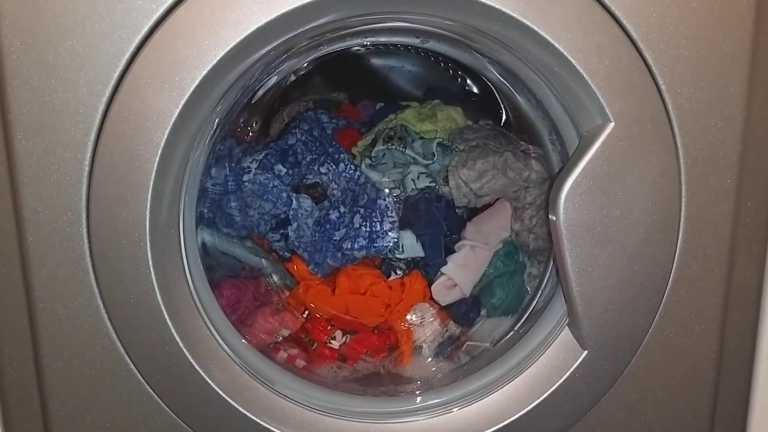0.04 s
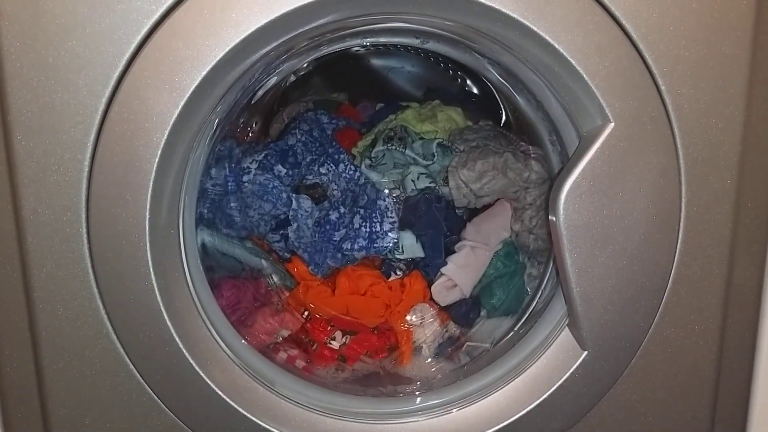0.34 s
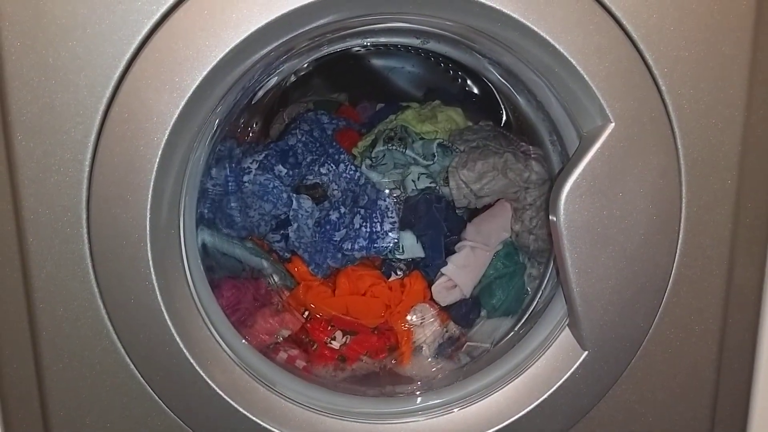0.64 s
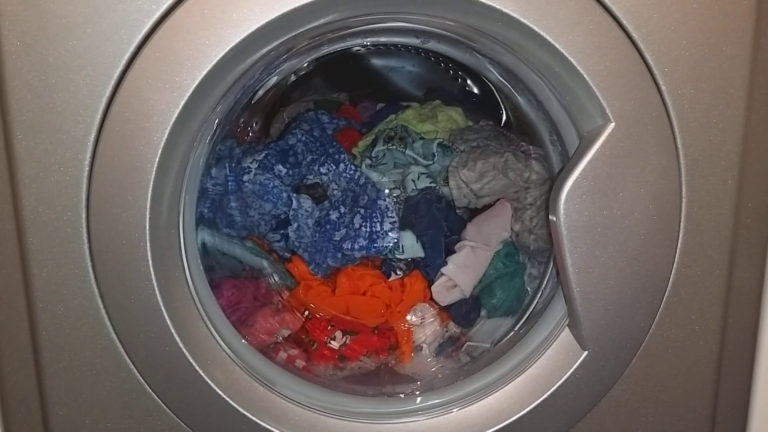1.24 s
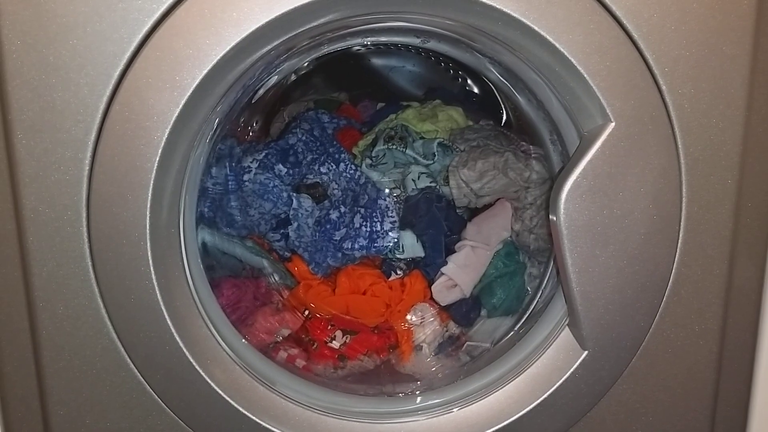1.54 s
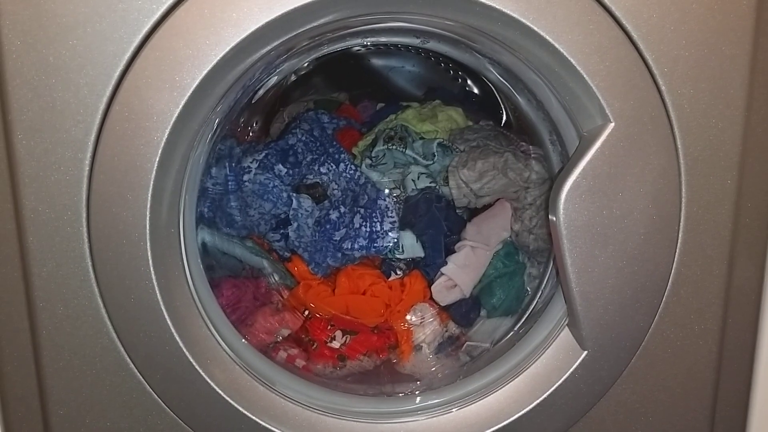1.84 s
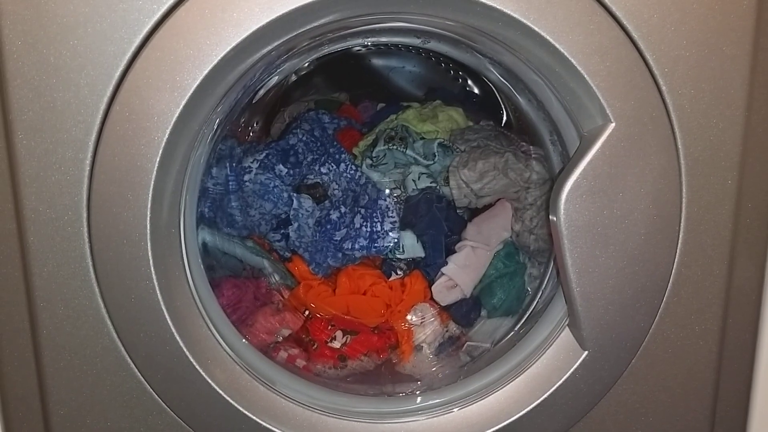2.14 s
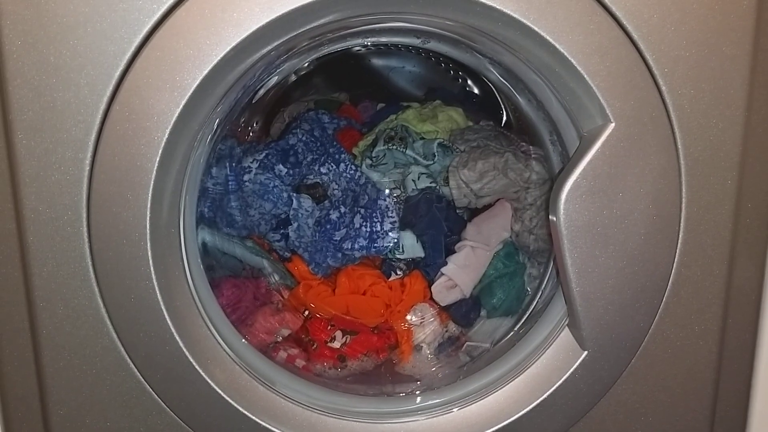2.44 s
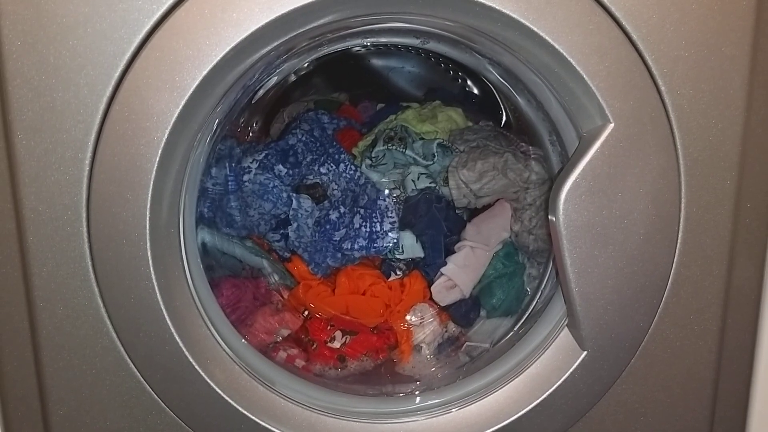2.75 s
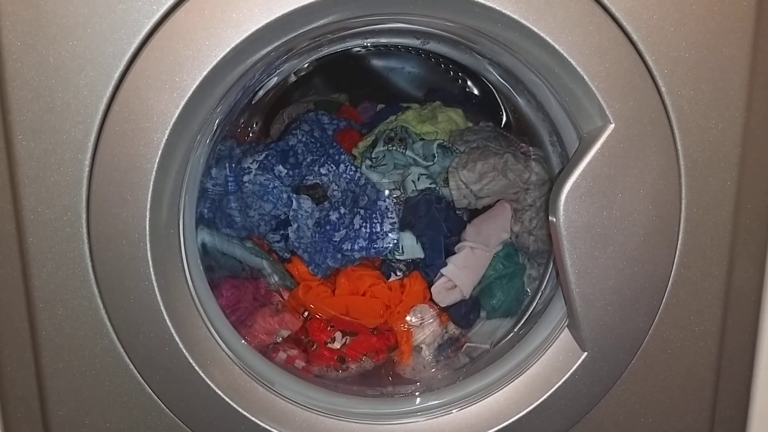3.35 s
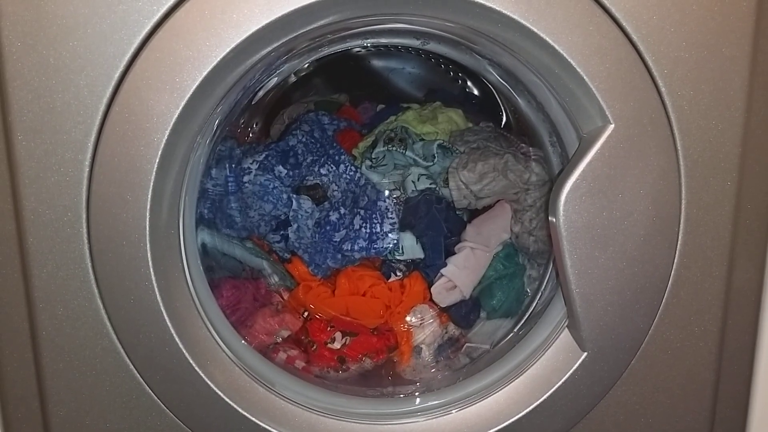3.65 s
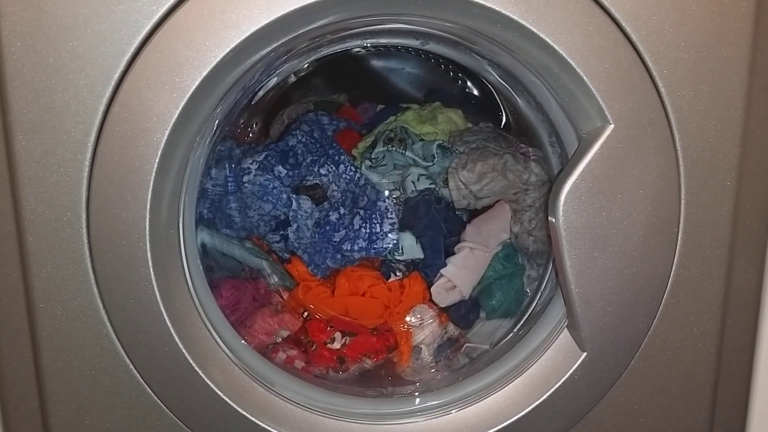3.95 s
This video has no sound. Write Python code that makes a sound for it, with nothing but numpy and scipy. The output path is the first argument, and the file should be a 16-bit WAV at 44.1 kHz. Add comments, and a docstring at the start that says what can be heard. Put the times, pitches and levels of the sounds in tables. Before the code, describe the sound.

A washing machine buzzes faintly over room noise, with soft trickles, a swish of wet cloth near 0.8 seconds and a drip at 1.4. At 1.7 seconds its drain pump starts with a few loud slugs of water, then churns air and water over a low, booming hum until the end at 4 seconds. Spray spits briefly, and the hose gurgles near 2.4, 3.6 and 3.9 seconds.

```python
"""A front-loading washing machine stands with a faint electric buzz over room noise.
Water trickles in the drum, wet cloth swishes, a drip falls. At 1.7 s the drain pump starts,
swallows a few slugs of water, then churns air and water over a mains hum while the sump booms.
Spray spits and the hose gurgles now and then; the splashes ring briefly in the steel cabinet."""
import sys
import numpy as np
from scipy import signal
from scipy.fft import rfft, irfft, next_fast_len
from scipy.io import wavfile
from scipy.ndimage import map_coordinates

SR = 44100
rng = np.random.default_rng(int(sys.argv[2]) if len(sys.argv) > 2 else 0)


def inscribe(sig):
    """Save sig as 16-bit PCM at rate SR to the path in sys.argv[1].

    A 1-D sig is mono; a 2-D sig holds one channel per row.
    Samples are clipped to [-1, 1] before scaling.
    """
    pcm = np.round(np.clip(np.atleast_2d(sig).T, -1, 1) * 32767)
    wavfile.write(sys.argv[1], SR, pcm.astype(np.int16))


N = 176400
TIME_S = np.arange(N) / SR


def amp(db):
    """Decibels to gain."""
    return 10 ** (np.asarray(db) / 20)


def along(points, hz):
    """Interpolate (hz, value) points on a log frequency axis."""
    knots_hz, values = np.transpose(points)
    return np.interp(np.log(hz + 1), np.log(knots_hz + 1), values)


def curves(rows):
    """One value per sample for each column after the time."""
    times_s, *columns = np.transpose(rows)
    return [np.interp(TIME_S, times_s, column) for column in columns]


def wobble(knots_per_s):
    """Smooth random curve."""
    return map_coordinates(rng.standard_normal(2048), [TIME_S * knots_per_s], mode="wrap")


def noise():
    """Two streams of white noise."""
    return rng.standard_normal((2, N))


def impacts(per_s, spread_db):
    """Two streams of tiny water impacts of random size."""
    hit = rng.random((2, N)) < per_s / SR
    return hit * np.sign(noise()) * amp(spread_db * np.clip(noise(), -2, 2))


def bursts(rows, attack_s, t60_s):
    """Envelope of events that rise, hold and die away."""
    power = 0
    for start_s, length_s, level_db in rows:
        rise = np.clip((TIME_S - start_s) / attack_s, 0, 1)
        decay_db = 60 * np.maximum(TIME_S - start_s - length_s, 0) / t60_s
        power += (rise * amp(level_db - decay_db)) ** 2
    return np.sqrt(power)


def filtered(x, response):
    """Apply a complex frequency response."""
    size = 2 * next_fast_len(N * 5 // 8)
    return irfft(rfft(x, size) * response(np.fft.rfftfreq(size, 1 / SR)), size)[..., :N]


def lowpass(hz, edge_hz):
    """Gain falling 24 dB per octave above the edge."""
    return 1 / (1 + (hz / edge_hz) ** 4)


def colour(points):
    """Minimum-phase response through (hz, db) points."""
    def response(hz):
        cepstrum = irfft(np.log(amp(along(points, hz))))
        causal = np.r_[cepstrum[0], 2 * cepstrum[1:len(cepstrum) // 2]]
        return np.exp(rfft(causal, len(cepstrum)))
    return response


def resonances(modes, hz):
    """Response of band-pass modes summed with alternating sign."""
    return sum((-1) ** k * amp(db) * 1j * hz * width / (centre ** 2 - hz ** 2 + 1j * hz * width)
               for k, (centre, width, db) in enumerate(modes))


# Left-right likeness: freq_hz, correlation
LIKENESS = [(60, 0.55), (170, 0.77), (350, 0.96), (700, 0.58), (1300, 0.26), (2300, 0.29), (4000, 0.075),
            (12000, 0)]
def stereo_angle(hz):
    """Angle between the channels in radians; 0 is identical."""
    return np.arccos(np.clip(along(LIKENESS, hz), -1, 1))


def pan_gains(pan, hz):
    """Left and right gains from a level difference."""
    return amp(np.outer([.5, -.5], along(pan, hz)))


def placed(pair, response, pan):
    """Two unrelated signals become a coloured stereo sound whose middle has rms 1."""
    def mid_side(hz):
        angle = stereo_angle(hz) / 2
        return response(hz) * np.array([np.cos(angle), np.sin(angle)])
    mid, side = filtered(pair, mid_side)
    out = filtered(np.array([mid + side, mid - side]), lambda hz: pan_gains(pan, hz))
    return out / out.mean(axis=0).std()


# Cabinet decay: freq_hz, t60_s
CABINET_DECAY = [(150, 0.1), (1000, 0.11), (4000, 0.3), (12000, 0.053)]
def cabinet(x, ring_db=-4.5):
    """Add the short ring of the steel cabinet."""
    hz, t, spectrum = signal.stft(rng.standard_normal((2, SR // 4)), SR, nperseg=256)
    decay = amp(-60 * t / along(CABINET_DECAY, hz)[:, None])
    tail = signal.istft(spectrum * decay, SR, nperseg=256)[1]
    tail /= np.linalg.norm(tail[0])
    return x + amp(ring_db) * signal.fftconvolve(x, tail, axes=1)[:, :N]


# Buzz spectrum: freq_hz, gain_db
BUZZ_SPECTRUM = [(180, -24), (300, -4.5), (745, 6), (969, -14), (1150, 7), (1310, -34), (1460, -13),
                 (1850, -21), (2110, 6.5), (2540, -4), (2750, -10.5), (3350, -10), (4240, -5),
                 (4840, -36.5), (7000, -4), (9100, -54), (15400, -120)]
# Harmonics the panels bring out: freq_hz, level_db
PANEL_TONES = [(98, -76.5), (344, -81), (443, -85), (516, -84.5), (738, -84), (1131, -81), (1475, -92.5),
               (2164, -78), (2262, -98), (2508, -76.5), (3787, -90), (3836, -90), (4230, -105.5),
               (4279, -80), (4328, -81), (4377, -84.5), (4426, -86)]
# Buzz balance: freq_hz, left_minus_right_db
BUZZ_PAN = [(110, 3.5), (380, 1), (1200, -8), (2380, -54), (4400, -12.5), (8000, 3)]
def buzz(pitch_hz=49.182, comb_db=-76.5):
    """Electric buzz: a comb of harmonics, a few of them raised by the panels."""
    hz = pitch_hz * np.arange(1, 140)
    gain = amp(along(BUZZ_SPECTRUM, hz))
    gain *= amp(comb_db) / np.linalg.norm(gain)
    for tone_hz, level_db in PANEL_TONES:
        gain[np.argmin(abs(hz - tone_hz))] = amp(level_db)
    phase = rng.uniform(0, 2 * np.pi, len(hz))
    phase_split = np.outer([.5, -.5], rng.choice([-1, 1], len(hz)) * stereo_angle(hz))
    harmonics = pan_gains(BUZZ_PAN, hz) * np.exp(1j * (phase + phase_split))
    harmonics *= gain / abs(harmonics.mean(axis=0))
    cycle = irfft(np.pad(harmonics, ((0, 0), (1, 0))), 4096, norm="forward") / np.sqrt(2)
    grid = np.linspace(0, 1, cycle.shape[1], endpoint=False)
    tone = np.array([np.interp(TIME_S * pitch_hz, grid, channel, period=1) for channel in cycle])
    return tone * amp(1.5 * wobble(6.5))


# Room noise spectrum: freq_hz, gain_db
ROOM_SPECTRUM = [(15, -47), (25, -11), (96, 1.5), (209, -9), (522, -4.5), (918, -11), (1140, -11),
                 (1370, -21.5), (1900, -17.5), (2110, -10.5), (2550, -8), (3430, -31), (4370, -9),
                 (7290, -24.5), (15500, -24)]
# Room and drum balance: freq_hz, left_minus_right_db
ROOM_PAN = [(110, -3.5), (380, -8), (1300, -1.5), (2400, -11.5), (4400, 4.5), (8000, 0)]
def room(level_db=-69):
    """Steady room noise."""
    return amp(level_db) * placed(noise(), colour(ROOM_SPECTRUM), ROOM_PAN)


# Trickle spectrum: freq_hz, gain_db
TRICKLE_SPECTRUM = [(150, -27), (420, 13), (800, -7), (1500, -29), (2700, -29), (6000, -21), (15000, -50)]
# Trickles: start_s, length_s, level_db
TRICKLES = [(.3, 0.27, -73.5), (.8, 0.14, -73), (1.1, 0.053, -67)]
def trickles():
    """Runs of small water impacts in the drum ring the cabinet."""
    drops = cabinet(impacts(per_s=750, spread_db=6))
    water = placed(drops, colour(TRICKLE_SPECTRUM), ROOM_PAN)
    return bursts(TRICKLES, attack_s=0.023, t60_s=0.25) * water


# Swish spectrum: freq_hz, gain_db
SWISH_SPECTRUM = [(200, -19), (800, 4), (1300, -15), (2600, 0), (3500, -12), (6000, -14), (12000, -37)]
# Swish: start_s, length_s, level_db
SWISHES = [(.78, 0.086, -69.5)]
def swish():
    """Wet cloth gives a soft swell of noise."""
    cloth = placed(noise(), colour(SWISH_SPECTRUM), ROOM_PAN)
    return bursts(SWISHES, attack_s=0.025, t60_s=0.16) * cloth


# Drip spectrum: freq_hz, gain_db
DRIP_SPECTRUM = [(60, -12), (150, -15), (400, 8), (900, -3), (1800, -9), (3000, -18), (10000, -35)]
# Drip: start_s, length_s, level_db
DRIPS = [(1.388, .002, -59.5)]
def drip():
    """A drip lands in the drum with a short, dull tap."""
    tap = placed(noise(), colour(DRIP_SPECTRUM), ROOM_PAN)
    return bursts(DRIPS, attack_s=.002, t60_s=0.072) * tap


PUMP_START_S, SPIN_UP_S, MAINS_HZ = 1.712, 0.2, 50
def spin_up():
    """0 before the pump starts, 1 at full speed."""
    return np.clip((TIME_S - PUMP_START_S) / SPIN_UP_S, 0, 1)


# Hum at full speed: time_s, second_harmonic_db, fourth_harmonic_db
HUM_LEVELS = [(1.75, -32, -40), (1.79, -26, -39), (1.84, -60, -33.5), (1.89, -34.5, -40.5),
              (2.08, -45, -59.5), (2.14, -46.5, -37), (2.64, -46, -52.5), (2.74, -37.5, -39),
              (3.09, -39, -34.5), (3.18, -35, -38), (3.82, -43.5, -38), (4.0, -33.5, -42)]
def pump_hum():
    """The pump motor hums at twice and four times the mains frequency."""
    phase = 2 * np.pi * MAINS_HZ * TIME_S + .06 * wobble(27)
    second_db, fourth_db = curves(HUM_LEVELS)
    second = amp(second_db) * np.sin(2 * phase)
    fourth = amp(fourth_db) * np.sin(4 * phase + 0.11 * wobble(19))
    return spin_up() * np.sqrt(2) * (second + fourth)


# Sump resonances, per filter pass: centre_hz, width_hz, gain_db
SUMP_MODES = [(148.3, 11.6, -8.5), (114.4, 18, -17)]
# Boom contour: time_s, gain_db
BOOM_CONTOUR = [(1.72, -73), (1.74, -29.5), (1.83, -39.5), (1.88, -24), (2.11, -55), (2.16, -44.5),
                (2.4, -36), (2.45, -46.5), (2.49, -43.5), (3.24, -39.5), (3.3, -30), (3.38, -46),
                (3.41, -37), (3.59, -52), (3.62, -37.5), (3.82, -65), (3.9, -32.5), (4.0, -60)]
def sump(trim_db=2):
    """The water column in the sump booms at one wavering pitch."""
    boom_db, = curves(BOOM_CONTOUR)
    ring = filtered(rng.standard_normal(N), lambda hz: resonances(SUMP_MODES, hz) ** 2)
    analytic = signal.hilbert(ring)
    boom = ring / (abs(analytic) + 1.8 * analytic.std())  # evens out the swells
    boom /= np.sqrt(np.mean(boom ** 2))
    return (TIME_S > PUMP_START_S) * amp(boom_db + trim_db) * boom


# Water load on the pump: time_s, tub_gain_db
WATER_LOAD = [(1.98, -41.5), (2.31, -47), (3.17, -37.5), (3.19, -40), (3.22, -38.5), (3.46, -49.5),
              (3.55, -45.5), (3.86, -46), (3.89, -41), (4.0, -39)]
# Tub resonances: centre_hz, width_hz, gain_db
TUB_MODES = [(243, 12.7, -4), (273.4, 10.6, -1), (311, 12.3, 4), (358, 43.5, -5.5), (389.5, 31.3, 0.5),
             (432, 16, -4), (535, 49, -12)]
# Pump housing resonances: centre_hz, width_hz, gain_db
HOUSING_MODES = [(765.6, 18.3, 2), (852, 27, -4.5), (1005, 56, -0.5), (1180, 40, 3), (1208, 50, 3),
                 (1314, 74, 1), (1395, 56, -2.5), (1643, 56, -2.5), (1837, 130, -4.5), (2155, 98, -1),
                 (2332, 68, -2.5), (2580, 83, -9)]
# Fizz spectrum: freq_hz, gain_db
FIZZ_SPECTRUM = [(30, -25.5), (70, 2), (200, 9.5), (600, -1.5), (1100, 0.5), (2300, -1.5), (2900, -4),
                 (3900, -5.5), (5000, -11), (5800, -16.5), (7300, -18.5), (9200, -28), (12000, -33),
                 (15500, -54)]
# Pump balance: freq_hz, left_minus_right_db
PUMP_PAN = [(150, 11), (450, -3.5), (800, 1.5), (1300, -3), (2200, -7), (3200, -1.5), (4500, 1.5),
            (8000, -0.5), (14000, 5.5)]
CHOP_HZ, CHOP_DEPTH = 27.8, .15
PRIME_DB, PRIME_DECAY_S = 3, 0.14  # extra splashing while the pump primes
def churn(tub_trim_db=2, housing_db=-39.5, fizz_db=-42):
    """The impeller chops air and water: impacts ring the tub and housing over a fizz."""
    def tub_response(hz):
        low_cut = 1 - np.exp(-(hz / 200) ** 2)
        return resonances(TUB_MODES, hz) * low_cut * lowpass(hz, 1200)

    def housing_response(hz):
        return resonances(HOUSING_MODES, hz) * lowpass(hz, 3200)

    chop = 1 + CHOP_DEPTH * np.sin(2 * np.pi * CHOP_HZ * TIME_S + 0.76 * wobble(5))
    chop += 0.068 * np.sin(2 * np.pi * 2 * MAINS_HZ * TIME_S)
    load_db, = curves(WATER_LOAD)
    knocks = chop * impacts(per_s=2000, spread_db=2.5)
    tub = amp(load_db + tub_trim_db) * placed(knocks, tub_response, PUMP_PAN)
    rattle = cabinet(chop * impacts(per_s=2600, spread_db=4))
    housing = amp(housing_db + .9 * wobble(35)) * placed(rattle, housing_response, PUMP_PAN)
    spray = np.sqrt(abs(chop)) * (impacts(per_s=6000, spread_db=3.5) + 0.43 * noise())
    fizz = amp(fizz_db + 0.65 * wobble(11)) * placed(spray, colour(FIZZ_SPECTRUM), PUMP_PAN)
    priming_db = PRIME_DB * np.exp(-np.maximum(TIME_S - PUMP_START_S, 0) / PRIME_DECAY_S)
    return spin_up() * (tub + amp(priming_db) * (housing + fizz))


# Slug spectrum: freq_hz, gain_db
SLUG_SPECTRUM = [(60, -33), (180, -7.5), (266, -9.5), (390, 0), (620, -19), (770, -1.5), (950, -14),
                 (1510, -15.5), (2190, -15), (2950, -23.5), (3750, -23), (6200, -37), (7200, -33.5),
                 (15500, -66.5)]
# Slugs: start_s, length_s, level_db
SLUGS = [(1.712, 0.023, -45), (1.751, 0.0058, -30), (1.822, 0.021, -30.5), (1.853, 0.018, -24),
         (3.9, 0.065, -36)]
def slugs():
    """Slugs of water hit the impeller and ring the cabinet."""
    hits = cabinet(impacts(per_s=5000, spread_db=4))
    splash = placed(hits, colour(SLUG_SPECTRUM), PUMP_PAN)
    return bursts(SLUGS, attack_s=0.00067, t60_s=.25) * splash


# Spray spectrum: freq_hz, gain_db
SPIT_SPECTRUM = [(100, -42), (2000, -39), (5500, 0), (7500, 2), (11000, -2), (15500, -7)]
# Spits: start_s, length_s, gain_db, edge_hz
SPITS = [(1.854, .015, -52.5, 14000), (2.039, .06, -62.5, 13000), (3.518, .004, -57.5, 14500),
         (3.618, .05, -68, 15000), (3.783, .01, -52, 9500)]
def spits():
    """Dense tiny impacts hiss in short spits of spray, some duller than others."""
    spray = placed(impacts(per_s=18000, spread_db=0), colour(SPIT_SPECTRUM), PUMP_PAN)
    out = np.zeros((2, N))
    for *event, edge_hz in SPITS:
        envelope = bursts([event], attack_s=.002, t60_s=0.35)
        out += envelope * filtered(spray, lambda hz: lowpass(hz, edge_hz))
    return out


# Hose gurgles: start_s, length_s, dry_level_db, start_pitch_hz
GURGLES = [(2.359, 0.097, -43.5, 1335), (3.552, 0.091, -38.5, 1310), (3.845, .07, -39.5, 1144),
           (3.895, 0.084, -36.5, 1306)]
FALL_OCT_PER_S, FADE_DB_PER_S = 6.26, 71
BUBBLE_SCATTER_OCT, BUBBLE_T60_CYCLES = 0.23, 26
def gurgles(bubbles=70):
    """Each gurgle in the hose is a cloud of ringing bubbles that grow, so its pitch falls."""
    out = np.zeros((2, N + SR))
    t = np.arange(SR // 20) / SR
    for start_s, length_s, level_db, start_hz in GURGLES:
        delays_s = np.linspace(0, length_s, bubbles)
        detune, strength, leans = rng.standard_normal((3, bubbles))
        octaves = BUBBLE_SCATTER_OCT * np.clip(detune, -2, 2) - FALL_OCT_PER_S * delays_s
        gains = amp(2 * strength - FADE_DB_PER_S * delays_s)
        cloud = np.zeros((2, SR // 2))
        for delay_s, hz, gain, lean in zip(delays_s, start_hz * 2 ** octaves, gains, leans):
            cycles = hz * t
            envelope = (1 - np.exp(-2 * cycles)) * amp(-60 * cycles / BUBBLE_T60_CYCLES)
            ring = gain * envelope * np.sin(2 * np.pi * cycles)
            at = int(delay_s * SR)
            cloud[:, at:at + len(t)] += np.outer([0.38 + 0.42 * lean, 1.15 - 0.24 * lean], ring)
        rms = np.sqrt(np.sum(cloud.mean(axis=0) ** 2) / (length_s * SR))
        start = int(start_s * SR)
        out[:, start:start + SR // 2] += amp(level_db) * cloud / rms
    return cabinet(out[:, :N])


def scene():
    """The machine heard from in front of its door."""
    idle = buzz() + room() + trickles() + swish() + drip()
    draining = pump_hum() + sump() + churn() + slugs() + spits() + gurgles()
    return idle + draining


BAND_LIMIT_HZ = 15700
def record(dry):
    """Brick-wall low-pass."""
    return filtered(dry, lambda hz: hz < BAND_LIMIT_HZ)


dry = scene()
out = record(dry)
inscribe(out)
```